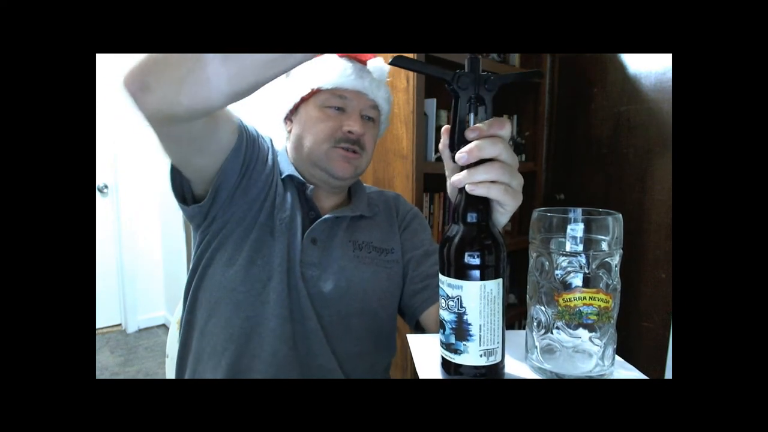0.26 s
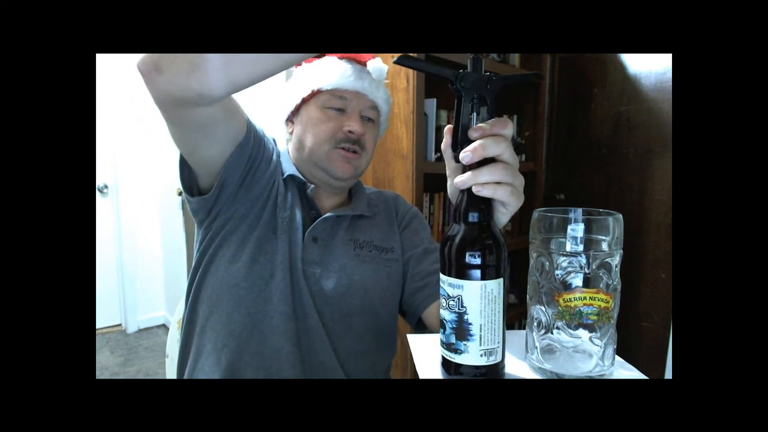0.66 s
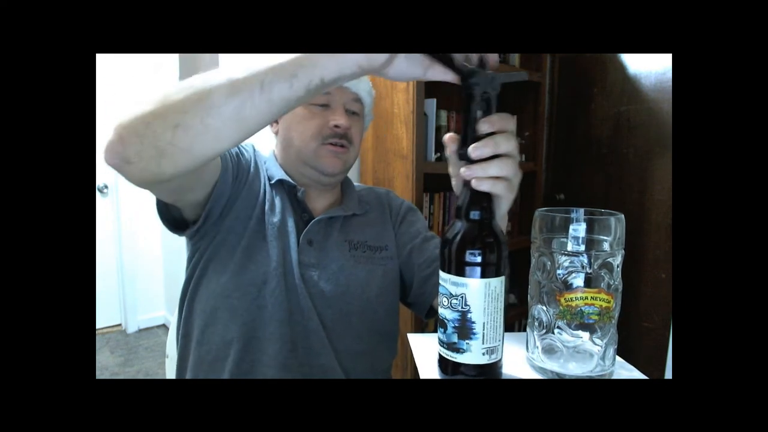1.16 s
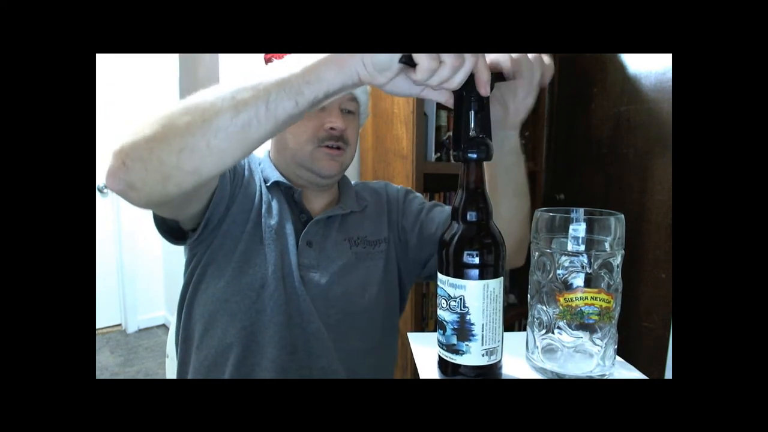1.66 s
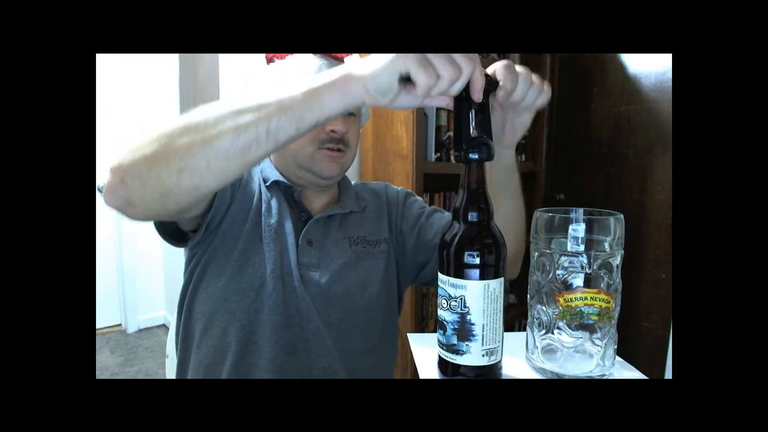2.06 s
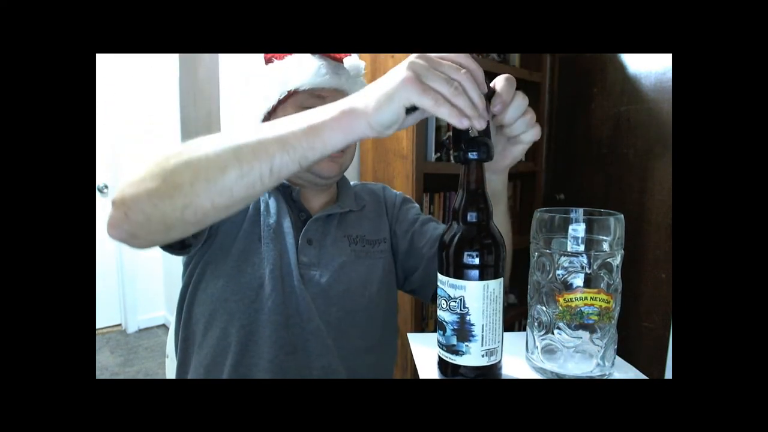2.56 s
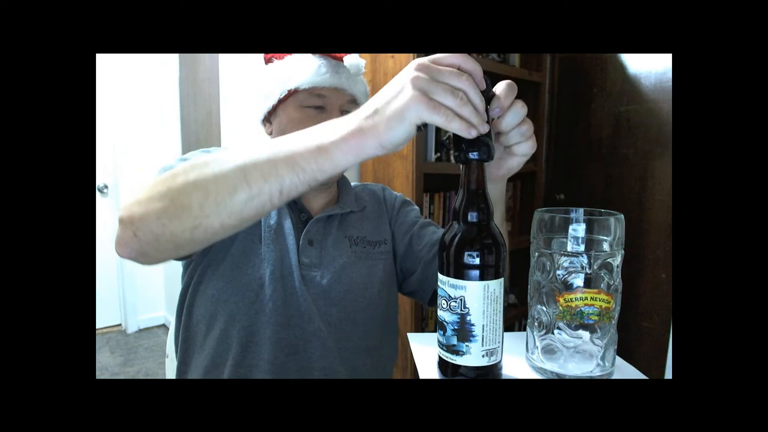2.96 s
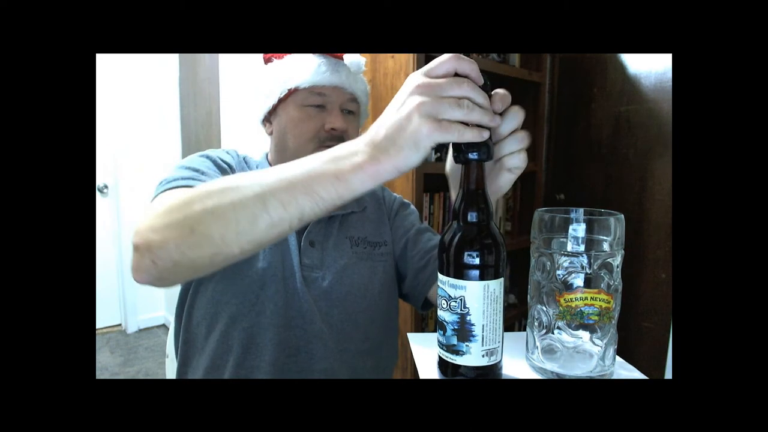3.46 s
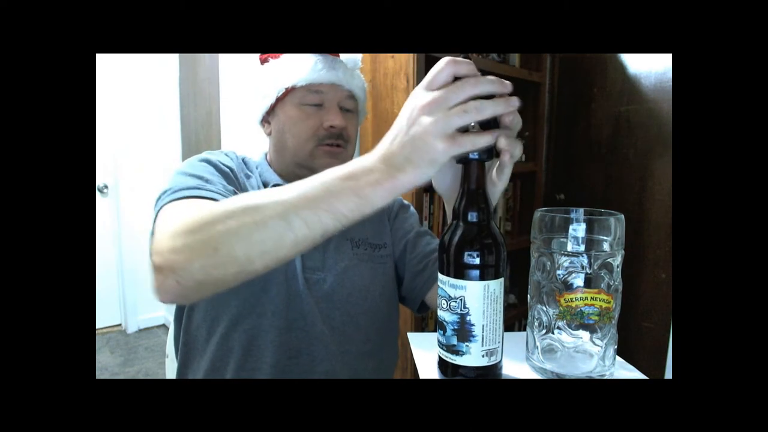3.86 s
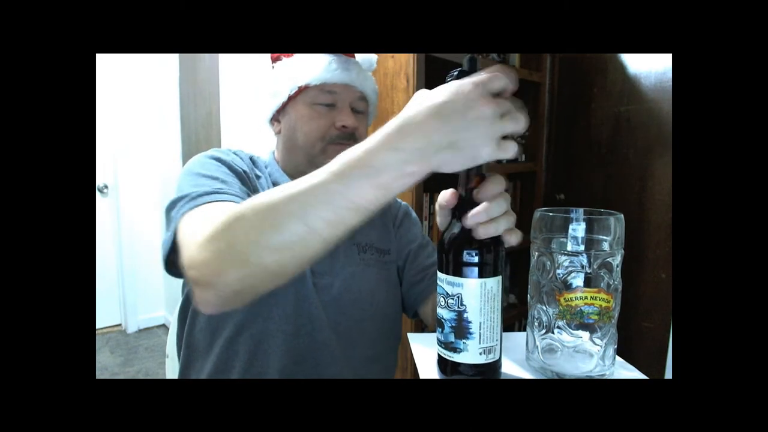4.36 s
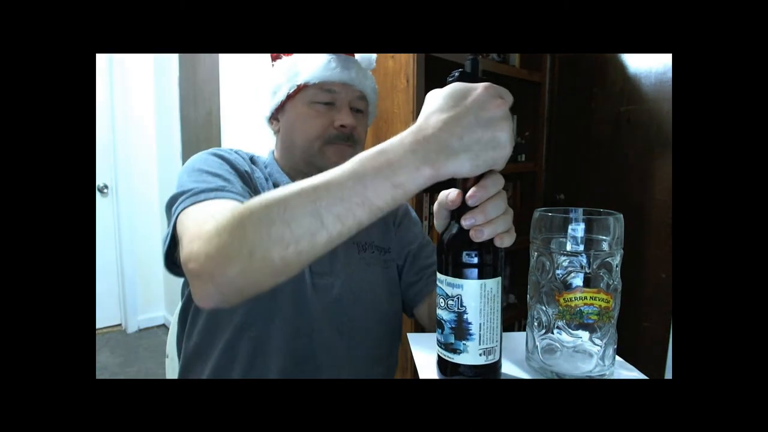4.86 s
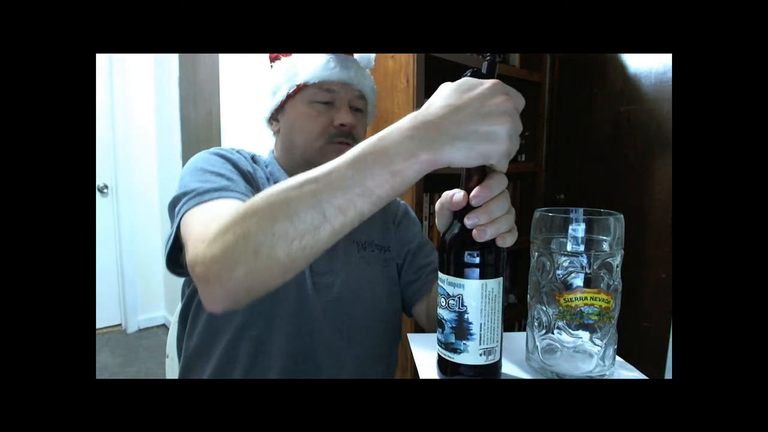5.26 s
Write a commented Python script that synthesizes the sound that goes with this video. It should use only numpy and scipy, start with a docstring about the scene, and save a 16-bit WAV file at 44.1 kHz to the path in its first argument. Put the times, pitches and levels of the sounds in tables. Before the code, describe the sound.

Small metallic clicks and ticks from a corkscrew on a bottle, one loud double snap, then denser clicks and a scraping, squeaking cork over faint hum.

```python
"""A winged corkscrew is worked into the cork of a bottle on a table, in a small room with a mains hum.
At first hands bump the table, the tool ticks (noise bursts plus ringing metal), and its gears creak.
Then both wings come down in one loud snap, two cracks close together, and the bottle knocks on the table.
More clicks follow; near the end the gripped cork turns in the neck, scraping (a crowd of tiny slips)
and squeaking (rough gliding tones)."""
import sys
import numpy as np
from scipy import signal
from scipy.fft import rfft, irfft, next_fast_len
from scipy.io import wavfile
from scipy.ndimage import uniform_filter1d

SR = 44100
rng = np.random.default_rng(int(sys.argv[2]) if len(sys.argv) > 2 else 0)


def to_wav(s):
    """Save 16-bit WAV."""
    ch = np.atleast_2d(s).T  # columns
    pcm = np.round(np.clip(ch, -1, 1) * 32767)  # PCM
    wavfile.write(sys.argv[1], SR, pcm.astype(np.int16))


N = 243002

# what the whole corkscrew rings with: pitch_hz [Hz], level_db [dB, relative], t60_s [s to fall by 60 dB]
METAL = [(1262, -4, 0.062), (1349, -13.5, 0.078), (1586, 1, 0.014), (3144, 3.5, 0.033), (3918, -2.5, 0.09),
         (4590, -10, 0.036), (5233, 2.5, 0.044), (7490, 7, 0.0037)]


def amp(db):
    """Turns decibels into a plain multiplier."""
    return 10 ** (np.asarray(db) / 20)


def evened(x):
    """Scales a sound to an average (RMS) level of 1."""
    return x / np.sqrt(np.mean(x ** 2) + 1e-20)


def read(points, hz):
    """Reads a curve of (Hz, value) points at any frequency, on a logarithmic pitch scale."""
    f, value = np.transpose(points)
    return np.interp(np.log(hz + 1), np.log(np.abs(f) + 1), value)


def add(mix, s, sound):
    """Adds a sound to the mix from s seconds on, cut off at the end of the mix."""
    part = mix[max(round(s * SR), 0):][:len(sound)]
    part += sound[:len(part)]


def seconds(length):
    """Counts time in seconds, sample by sample, for at least 8 samples."""
    return np.arange(max(int(length * SR), 8)) / SR


def coloured(x, points):
    """Causal filter with the given spectrum: it shapes the tone without sounding ahead of the blow."""
    size = next_fast_len(len(x) + 2048)
    hz = abs(np.fft.fftfreq(size, 1 / SR))
    log_gain = np.log(amp(read(points, hz)))
    response = np.exp(np.conj(signal.hilbert(log_gain)))
    return np.fft.ifft(np.fft.fft(x, size) * response).real[:len(x)]


def struck(x):
    """Scales a blow so that its energy, spread over 5 ms, has level 1."""
    return x / np.sqrt(np.sum(x ** 2) / (.005 * SR) + 1e-20)


def ringing(modes, t):
    """Dying tones of a struck body, each started at a random point of its swing."""
    return sum(amp(db - 60 * t / t60) * np.sin(2 * np.pi * (hz * t + rng.random()))
               for hz, db, t60 in modes)


def wander(count, width_hz):
    """Complex noise whose strength and phase drift as fast as the width allows."""
    smooth = signal.butter(2, min(width_hz / 2, SR / 4), fs=SR, output="sos")
    return signal.sosfilt(smooth, rng.standard_normal(count) + 1j * rng.standard_normal(count))


def clicks(crack_s=0.0033, lead_in_db=-21, lead_in_s=0.0034, chatter_db=-17, chatter_s=0.021,
           metal_db=-4, metal_growth=0.39, part_db=-4, part_width_hz=850):
    """Faint noise swells for a few ms, then a part cracks, rebounds, clacks at its pitch and rings the tool."""
    # clicks of the corkscrew: start_s [s], level_db [dB, nominal peak], pitch_hz [Hz, of the struck part],
    # body_db and top_db [dB, against the middle region]
    blows = [(0.027, -42, 3000, -11.5, -22), (0.109, -39.5, 2100, -21, -19), (0.155, -33, 4430, -21, -17),
             (0.229, -39, 2920, -23, -28), (0.449, -26.5, 4800, -36, -20.5), (0.579, -38, 2260, -8, -17.5),
             (0.602, -29, 2430, -20, -19), (0.786, -29.5, 4670, -22, -40), (0.843, -26, 4950, -29, -20.5),
             (0.889, -24.5, 4440, -27.5, -19.5), (0.94, -34.5, 3100, -24.5, -15),
             (0.991, -24, 3630, -43, -25.5), (1.042, -29.5, 4380, -27, -19.5),
             (1.269, -25.5, 3700, -32.5, -18.5), (1.641, -27.5, 5220, -30.5, -27),
             (2.229, -28, 4140, -86, -19), (2.886, -27, 6100, -18, -10.5), (3.131, -42, 6760, -53, -13.5),
             (3.535, -37.5, 6400, -36, -23), (3.564, -32.5, 3930, -27, -20.5), (3.737, -36, 3550, -31, -12),
             (4.054, -33, 4800, -15, -23), (4.16, -27.5, 3630, -20.5, -16.5),
             (4.201, -30.5, 3600, -14.5, -26), (4.251, -17, 3370, -24, -19),
             (4.389, -17.5, 4850, -29.5, -23.5), (4.617, -39, 1244, -12.5, -44),
             (4.719, -43, 1030, -10.5, -10), (4.767, -36, 4720, -20, -18), (4.779, -26, 3860, -21, -24),
             (4.823, -31, 4960, -5.5, -17), (4.866, -23.5, 990, -2, -54), (4.957, -24, 5430, -22, -18),
             (5.021, -30.5, 6040, -23.5, -23), (5.062, -33, 3140, -24.5, -25),
             (5.151, -26.5, 4900, -27, -20), (5.214, -23.5, 6130, -16.5, -16),
             (5.306, -27.5, 5100, -28, -27)]
    # centres of the body, middle and top regions: pitch_hz [Hz]
    colour_hz = [1642, 4224, 8720]
    # colour of the steel, common to all clicks: pitch_hz [Hz], level_db [dB]
    steel = [(1700, 12.5), (4200, -0.5), (8600, 3.5)]
    # outer slopes of every click: pitch_hz [Hz], level_db [dB]
    edges = [(80, -48.5), (260, -1), (650, -29.5), (1000, 0.5), (1500, -1), (2200, 4), (3200, 0.5),
             (8400, 7), (10000, -2.5), (16500, -35)]
    crest_db = 9.5  # a click nominally peaks this far above its 5 ms level
    catch_s, catch_db, catch_above_db = 0.0078, -9, -21
    rebound_s, rebound_db, rebound_count = 0.017, -9.5, 2  # the gap is varied at random below

    out, t, lead = np.zeros(N), seconds(.08), seconds(.02)
    since = np.concatenate([-lead[::-1], t])  # time since the crack
    count = len(since)

    def pulse(delay, decay):
        return (since >= delay) * np.exp(-abs(since - delay) / decay)

    lead_in = amp(lead_in_db) * (since < 0) * np.exp(-abs(since) / lead_in_s)
    catch = amp(catch_db) * pulse(-catch_s, crack_s)
    release = pulse(0, crack_s) + amp(chatter_db) * pulse(0, chatter_s)
    for s, db, hz, body_db, top_db in blows:
        delays = np.cumsum(rebound_s * rng.uniform(0.36, 1.5, rebound_count))
        rebounds = sum(amp(rebound_db * (k + 1)) * pulse(delay, crack_s / 2)
                       for k, delay in enumerate(delays))
        # under a hard push a part catches just before it lets go
        force = lead_in + catch * (db > catch_above_db) + release + rebounds
        crack = struck(rng.choice([-1., 1.], count) * force)

        # the hand damps the tool: only hard blows make its modes ring out
        ring = struck(np.concatenate([0 * lead, ringing(METAL, t)]))
        ring = amp(metal_db + metal_growth * db) * ring
        own_colour = list(zip(colour_hz, [body_db, 0, top_db]))
        blow = struck(coloured(coloured(crack + ring, steel), own_colour))

        band = np.clip([hz - part_width_hz / 2, hz + part_width_hz / 2], 100, SR / 3)
        part = signal.butter(2, band, "band", fs=SR, output="sos")
        clack = signal.sosfilt(part, rng.choice([-1., 1.], count) * force)
        click = struck(coloured(blow + amp(part_db) * struck(clack), edges))
        add(out, s - lead[-1], amp(db - crest_db) * click)
    return out


def snap(crack_s=0.0024, clatter_db=-20, clatter_s=0.037, lead_in_db=-21, lead_in_s=0.0045, metal_db=-16):
    """After a short swell of noise both wings slam home and clatter in their pivots; the whole tool rings."""
    # colour of the slam: pitch_hz [Hz], level_db [dB]
    slam = [(120, -59), (200, -22.5), (558, -30.5), (1230, -1.5), (2420, -12.5), (3190, -1), (3560, -9.5),
            (5420, -4), (7140, -16.5), (7830, -6.5), (8580, -14.5), (16000, -42.5)]
    snap_s, snap_db = 3.8746, -12.5
    first_wing_s, first_wing_db = .0025, -11  # lead of the first wing, and its level against the second
    out, t, lead = np.zeros(N), seconds(.2), seconds(.02)
    fade = np.exp(-t / crack_s)
    lead_in = amp(lead_in_db) * np.exp(-lead[::-1] / lead_in_s)
    clatter = amp(clatter_db) * np.exp(-t / clatter_s)
    force = np.concatenate([lead_in, fade + clatter])

    def crack(force):
        return struck(coloured(rng.choice([-1., 1.], len(force)) * force, slam))

    add(out, snap_s - first_wing_s, amp(first_wing_db) * crack(fade))
    add(out, snap_s - lead[-1], crack(force))
    add(out, snap_s, amp(metal_db) * struck(ringing(METAL, t)))
    return amp(snap_db) * out


def drag(slips_per_s=650, hiss=0.71, judder_db=2.5, judder_hz=200):
    """Hundreds of small slips a second between cork and glass, bunched as the cork judders round."""
    # colour of the scraping cork: pitch_hz [Hz], level_db [dB]
    cork = [(180, -55.5), (300, -21.5), (515, -26), (568, -21), (991, -9.5), (1820, -8.5), (4770, -0.5),
            (9640, -17), (11700, -26.5), (15000, -99)]
    # one twist of the cork: it starts to creep, turns freely, and stalls
    creep_s, turn_s, stall_s, turn_db = 4.97, 5.306, 5.408, -47.5
    loosen_db_per_s, stall_db_per_s = 74, 178
    slip_spread_db = 6  # scale of the random strength, which is capped at twice this
    t = np.arange(N) / SR
    loosening_db = loosen_db_per_s * np.maximum(turn_s - t, 0)
    stalling_db = stall_db_per_s * np.maximum(t - stall_s, 0)
    level_db = turn_db - loosening_db - stalling_db
    slips = (rng.random(N) < slips_per_s / SR) * rng.choice([-1, 1], N)
    slips = slips * amp(slip_spread_db * np.minimum(rng.exponential(1, N), 2))
    grain = evened(slips) + hiss * rng.standard_normal(N)
    grain = grain * amp(judder_db * evened(wander(N, judder_hz).real))
    return evened(coloured(grain, cork)) * amp(level_db) * (t > creep_s)


def squeaks(steady=0.46, overtone_db=-4, damped_above_hz=7300, wobble=0.011, wobble_hz=40):
    """Fast stick and slip: a rough gliding tone with two overtones, which the cork damps when they lie high."""
    # squeaks of screw and cork: start_s, end_s [s], first_hz, last_hz [Hz, glide], width_hz [Hz, roughness
    # of the lowest tone], level_db [dB, before the mix]
    glides = [(0.46, 0.496, 4750, 4900, 450, -74), (0.76, 0.86, 4960, 5000, 487, -62.5),
              (5.041, 5.238, 2050, 1950, 198, -68.5), (5.155, 5.26, 4690, 4800, 149, -53),
              (5.289, 5.396, 842, 1080, 167, -56), (5.442, 5.557, 2690, 3120, 70.4, -57)]
    out = np.zeros(N)
    for start, end, first_hz, last_hz, width_hz, db in glides:
        count = len(seconds(end - start))
        unsteady = 1 + wobble * evened(wander(count, wobble_hz).real)
        hz = np.linspace(first_hz, last_hz, count) * unsteady
        turn = np.exp(2j * np.pi * np.cumsum(hz) / SR)
        tone = 0
        for k in range(1, 4):
            gain = amp(overtone_db * k) / (1 + (k * first_hz / damped_above_hz) ** 6)
            rough = evened((wander(count, width_hz * k) * turn ** k).real)
            tone = tone + gain * (rough + steady * (turn ** k).real)
        add(out, start, amp(db) * evened(tone) * signal.windows.tukey(count, .5))
    return out


def knocks(rise_s=0.0018, crest_db=4):
    """The heavy glass rocks on the table top and rings briefly."""
    # knocks of the bottle on the table: start_s [s], level_db [dB, nominal peak]
    hits = [(0.16, -54.5), (0.588, -50.5), (0.602, -47), (1.045, -53), (3.89, -33), (4.375, -50),
            (4.718, -53.5), (4.783, -30), (4.864, -40.5)]
    # what the bottle rings with: pitch_hz [Hz], level_db [dB, relative], t60_s [s to fall by 60 dB]
    bottle = [(250, -14.5, 0.02), (384, 1, 0.085), (463, 7, 0.03), (582, 0.5, 0.055), (627, 0, 0.05),
              (777, 13.5, 0.012)]
    out, t = np.zeros(N), seconds(.2)
    for s, db in hits:
        knock = struck(ringing(bottle, t) * (1 - np.exp(-t / rise_s)))
        add(out, s, amp(db - crest_db) * knock)
    return out


def creaks():
    """Gear teeth under load catch and slip in an even run of tiny ticks."""
    # creaks: start_s, end_s [s], rate [ticks per s], level_db [dB, each tick over 5 ms]
    runs = [(1.799, 1.833, 111, -52), (3.346, 3.42, 63.5, -53.5), (3.47, 3.495, 72, -60),
            (3.762, 3.859, 71, -56.5)]
    # colour of one tick: pitch_hz [Hz], level_db [dB]
    tooth = [(500, -31.5), (2500, -19), (4000, -6.5), (5600, 0), (7500, -8.5), (10000, -25.5),
             (15000, -50.5)]
    out, t = np.zeros(N), seconds(.02)
    fade = np.exp(-t / .0012)
    for start, end, rate, db in runs:
        for s in np.arange(start, end, 1 / rate):
            tick = coloured(rng.standard_normal(len(t)) * fade, tooth)
            add(out, s, amp(db) * struck(tick))
    return out


def rubs():
    """Smooth sliding of metal and fingers gives a brief swell of hiss."""
    # soft slides: start_s, end_s [s], pitch_hz [Hz, centre], level_db [dB, before the mix]
    slides = [(0.304, 0.401, 6960, -65.5), (0.337, 0.394, 2177, -64), (1.28, 1.423, 6320, -64.5),
              (2.386, 2.426, 7050, -65), (3.731, 3.909, 6040, -64), (4.955, 5.011, 4950, -53.5)]
    width = 0.42  # width of the hiss as a share of its centre
    out = np.zeros(N)
    for start, end, hz, db in slides:
        t = seconds(end - start)
        hiss = (wander(len(t), width * hz) * np.exp(2j * np.pi * hz * t)).real
        add(out, start, amp(db) * evened(hiss) * signal.windows.tukey(len(t), .7))
    return out


def bumps(swell_s=0.0056, swing_db=0.5):
    """Soft pushes of the hands make the table swing for a few cycles."""
    # dull bumps of the table: start_s [s], level_db [dB, nominal peak], pitch_hz [Hz]
    pushes = [(0.009, -50, 119), (0.042, -49.5, 129), (0.073, -44.5, 118), (0.106, -40.5, 126.6),
              (0.394, -54.5, 125), (0.651, -48, 120), (0.825, -52, 244), (3.903, -35, 132.5)]
    out, t = np.zeros(N), seconds(.12)
    swell = (t / swell_s) ** 2 * np.exp(-t / swell_s)
    for s, db, hz in pushes:
        swing = np.sin(2 * np.pi * (hz * t + rng.random()))
        add(out, s, amp(db + swing_db) * swing * swell / swell.max())
    return out


def background(waver=0.084):
    """Mains hum, a few steady tones wavering a little in strength, over the noise of the room air."""
    # tones of the hum: pitch_hz [Hz], level_db [dB, RMS]
    tones = [(120, -68.5), (240, -76), (436, -82.5)]
    # colour of the room air: pitch_hz [Hz], level_db [dB]
    air = [(30, -30.5), (80, -5.5), (160, 1.5), (350, -3), (1000, -10.5), (2600, -10.5), (6000, -13),
           (12000, -30), (16000, -36.5)]
    air_db = -68.5
    t = np.arange(N) / SR
    hum = 0
    for hz, db in tones:
        tone = amp(db) * np.sqrt(2) * np.sin(2 * np.pi * (hz * t + rng.random()))
        hum = hum + tone * (1 + waver * evened(wander(N, 19).real))
    return hum + amp(air_db) * evened(coloured(rng.standard_normal(N), air))


def room(x, wet_db=-2, gap_s=0.0012, apart=0.043):
    """Dense reflections, each band dying at its own speed, almost alike in both channels."""
    # how long the room rings: pitch_hz [Hz], t60_s [s to fall by 60 dB]
    decay = [(120, 0.23), (1500, 0.26), (6000, 0.25), (15000, 0.21)]
    count = SR // 2
    noise = rng.standard_normal((2, count)) * (rng.random((2, count)) < .15)
    shared, own = noise * (np.arange(count) > gap_s * SR)
    pair = np.array([shared + apart * own, shared - apart * own])
    hz, t, z = signal.stft(pair, SR, nperseg=256)
    tail = signal.istft(z * amp(-60 * t / read(decay, hz)[:, None]), SR, nperseg=256)[1]
    echoes = signal.fftconvolve(x[None], tail / np.linalg.norm(tail[0]), axes=1)[:, :N]
    return x + amp(wet_db) * echoes


def suppressed(x, depth_db=8, margin_db=13, from_hz=700, full_hz=2600):
    """Noise suppressor: treble that sinks towards its own quiet level is turned down, which shortens the tails."""
    hz, _, z = signal.stft(x, SR, nperseg=512)
    power = (abs(z) ** 2).mean(0)  # both channels together
    power = uniform_filter1d(power, size=15, axis=0)
    power = uniform_filter1d(power, size=3, axis=1) + 1e-20
    quiet = np.percentile(power, 15, axis=1, keepdims=True)
    closed = 1 / (1 + (power / (quiet * amp(margin_db) ** 2)) ** 2)  # 0 leaves alone, 1 turns down fully
    depth = read([(from_hz, 0), (full_hz, depth_db)], hz)[:, None]
    return signal.istft(z * amp(-depth * closed), SR, nperseg=512)[1][:, :N]


def scene():
    """Blows and friction sound in the room; bumps and hum lie underneath."""
    strikes = room(clicks() + snap() + knocks() + creaks(), wet_db=-5.5)
    friction = room(squeaks() + rubs() + drag(), wet_db=-6)
    return strikes + amp(3.5) * friction + bumps() + background()


def record(dry, low_cut_hz=62, high_cut_hz=16500):
    """The microphone pair hears the bass mostly on the left and overloads; then suppressor and band limits."""
    # balance of the two channels: pitch_hz [Hz], level_db [dB, left minus right]
    balance = [(30, 0), (90, 17), (130, 19.5), (250, 8.5), (1000, 2), (4200, -2), (9000, 1)]
    lean = amp(read(balance, np.fft.rfftfreq(N, 1 / SR)))
    sides = np.array([2 * lean, 2 + 0 * lean]) / (1 + lean)
    heard = irfft(rfft(dry) * sides, N)
    ceiling = .48  # peaks are rounded off towards this
    heard = suppressed(heard / (1 + (heard / ceiling) ** 6) ** (1 / 6))
    heard = signal.sosfilt(signal.butter(2, low_cut_hz, "high", fs=SR, output="sos"), heard)
    low_pass = signal.firwin(511, high_cut_hz, window=("kaiser", 9), fs=SR)
    return signal.oaconvolve(heard, low_pass[None], "same")


dry = scene()
out = record(dry)
to_wav(out)
```